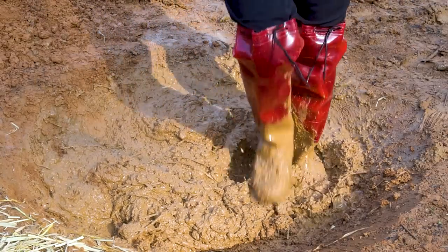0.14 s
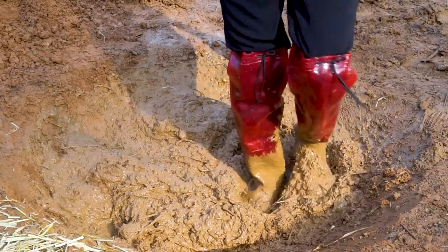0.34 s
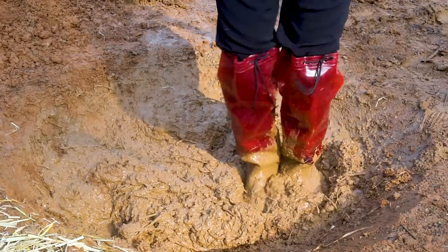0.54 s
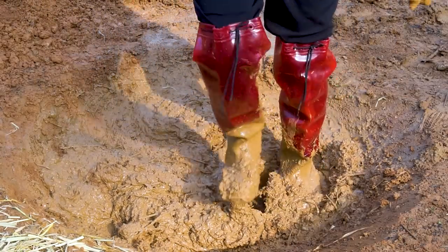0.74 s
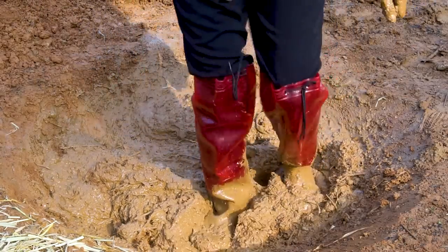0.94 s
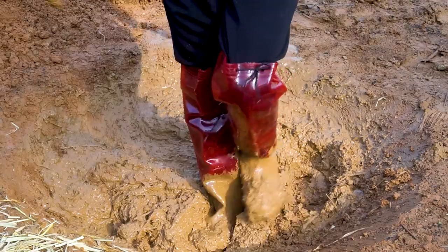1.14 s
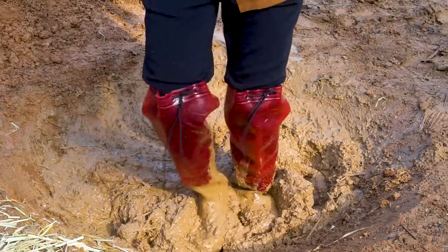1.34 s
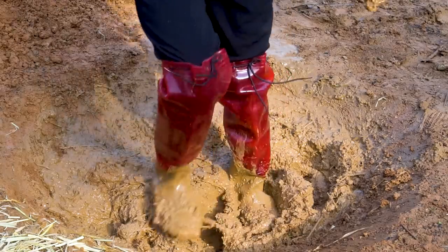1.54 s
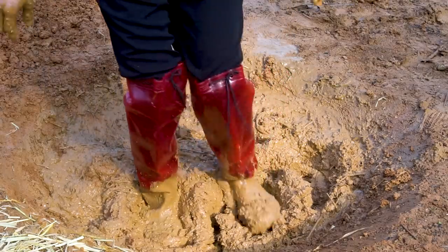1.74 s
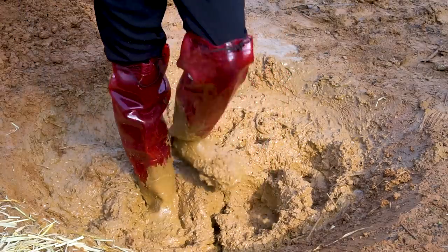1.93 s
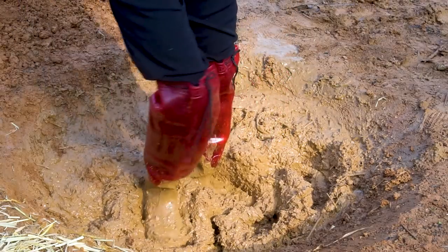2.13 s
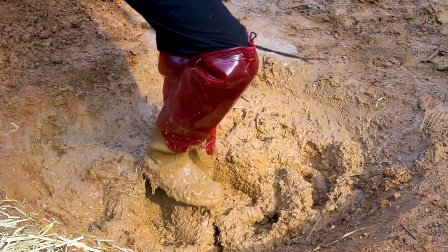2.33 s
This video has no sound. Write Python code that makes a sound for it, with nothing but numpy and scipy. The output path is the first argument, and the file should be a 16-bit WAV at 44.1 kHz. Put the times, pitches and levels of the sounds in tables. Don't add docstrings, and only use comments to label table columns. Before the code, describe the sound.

Someone kneads sticky clay with boots, each step squirting and crackling wetly, each lift sucking and gulping. Several quick squelches follow one another, heard very close in stereo in open air, with barely audible insects behind.

```python
import sys
import numpy as np
from scipy import signal
from scipy.fft import rfft, irfft, next_fast_len
from scipy.io import wavfile

SR = 44100
rng = np.random.default_rng(int(sys.argv[2]) if len(sys.argv) > 2 else 0)


def file_out(sig):
    cols = np.atleast_2d(sig).T
    lim = np.clip(cols, -1, 1)
    pcm = np.round(lim * 32767).astype(np.int16)
    wavfile.write(sys.argv[1], SR, pcm)


def natural_amplitude(level_db):
    exponent = np.asarray(level_db, float) / 20
    return 10 ** exponent


N = 110250

# peak_s, rise_s, fall_s, level_db, tilt_db_per_octave
SPLATS = [(.002, 0.014, 0.039, -44.5, -2), (0.208, 0.013, 0.029, -24.5, -0.5),
          (0.233, 0.01, 0.0074, -21, 5), (0.263, 0.11, 0.05, -48, -3.5), (0.334, 0.01, 0.0033, -31, -3.5),
          (0.368, 0.0017, 0.011, -34.5, -4), (0.505, 0.004, 0.046, -34.5, 0),
          (0.539, 0.011, 0.019, -30.5, 0), (0.628, 0.11, 0.083, -41.5, -1.5),
          (0.893, 0.0061, 0.022, -26, 1.6), (0.927, 0.061, 0.064, -34.5, 0.05),
          (1.023, 0.041, 0.036, -37.5, -0.1), (1.241, 0.025, 0.033, -32, -2),
          (1.266, 0.0086, 0.015, -25, -2), (1.317, 0.04, 0.02, -37, -0.6), (1.335, 0.0039, 0.0096, -31, 3),
          (1.408, 0.065, 0.055, -34, -2.5), (1.645, 0.033, 0.023, -24.5, 3),
          (1.791, 0.012, 0.015, -22.5, -2.5), (2.031, 0.022, 0.02, -25, 3), (2.056, 0.014, 0.27, -49, -2.5),
          (2.171, 0.02, 0.023, -34.5, -0.2), (2.206, 0.024, 0.034, -25, -2),
          (2.481, 0.004, 0.013, -33, -0.5)]
# freq_hz, density_db (per Hz)
MUD_SPECTRUM = [(150, -58), (300, -4.5), (600, -11), (1200, -5.5), (2500, -0.5), (5000, -3), (8500, -8.5),
                (12500, -5)]
# peak_s, rise_s, fall_s, level_db, cavity_hz
SUCKS = [(.01, 0.032, 0.029, -58, 433), (.297, 0.046, 0.043, -33, 1350), (0.381, 0.006, 0.055, -42, 1210),
         (0.3, 0.048, 0.033, -41, 387), (0.54, 0.052, 0.011, -41, 700), (0.618, 0.024, 0.0077, -60, 470),
         (0.696, 0.011, 0.011, -69, 1300), (0.895, 0.011, 0.019, -41.5, 620),
         (0.936, 0.013, 0.0044, -53, 846), (1.025, 0.075, 0.02, -47.5, 1180),
         (2.107, 0.006, 0.0091, -47, 298), (2.015, 0.0018, 0.0044, -37.5, 8900),
         (1.297, 0.0073, 0.017, -47.5, 860), (1.402, 0.042, 0.042, -28, 3730),
         (1.643, 0.031, 0.012, -40, 610), (1.695, 0.004, 0.011, -39.5, 2320),
         (1.755, 0.026, 0.0055, -40.5, 1400), (1.771, 0.014, 0.0076, -37.5, 1210),
         (1.799, 0.0069, 0.012, -35.5, 590), (2.037, 0.028, 0.011, -31.5, 1020),
         (2.108, 0.006, 0.02, -41.5, 1650), (2.143, 0.013, 0.0093, -47, 1600),
         (2.211, 0.015, 0.012, -38.5, 290), (1.264, 0.013, 0.0091, -27.5, 756)]
# start_s, peak_db, pocket_hz
POPS = [(0.185, -38, 1200), (0.2255, -8.5, 2470), (0.322, -17.5, 3570), (0.331, -25.5, 1210),
        (0.4093, -22.5, 2500), (.4413, -23.5, 2650), (0.5825, -26.5, 1800), (0.8657, -31, 5830),
        (0.9938, -24, 1760), (1.0334, -19, 1990), (1.067, -28, 3860), (1.1199, -20.5, 2090),
        (1.132, -27, 4460), (1.262, -10.5, 2010), (1.2652, -8.5, 1930), (1.355, -31, 1830),
        (1.6437, -11, 3140), (1.675, -23, 3400), (1.7082, -24.5, 3900), (1.7736, -19, 1780),
        (1.8183, -19.5, 4470), (2.1037, -14, 2080), (2.1164, -18.5, 2640), (2.172, -14.5, 3400),
        (2.319, -31, 2660), (2.446, -27, 3380), (2.4615, -27.5, 2350),
        (1.491, -31, 9800),
    (1.77, -33, 8900),
    (2.269, -37, 4640),
    (2.282, -28, 5800),
    (2.471, -29.5, 2550),
    (2.479, -27, 4800),
    (2.4985, -26, 2960),
    (2.458, -21, 8000),
        (0.3657, -15.5, 2310), (0.398, -36, 2500), (2.076, -27, 4260), (2.11, -17, 12000),
         (2.253, -44, 2500), (1.23, -17, 8200), (1.257, -9, 7150), (.424, -30, 2450), (.456, -31, 1940),
         (.501, -24, 2480), (0.633, -25, 2890), (0.657, -29, 3040), (0.693, -34, 2340), (.966, -26, 2170),
         (1.007, -27, 3430), (1.019, -26, 3300), (1.104, -30.5, 2700), (1.691, -23.5, 1830),
         (1.782, -17, 2700), (2.159, -26.5, 1980)]
# start_s, peak_db, pitch_hz, t60_s, glide_octaves (per 10 ms)
GULPS = [(.008, -36.5, 347, .02, -0.27), (.104, -55, 1320, .03, 0.), (.281, -20, 820, 0.014, -0.046),
         (.298, -33, 1820, 0.024, 0.046), (.305, -34, 583, 0.017, -0.41), (.374, -34, 900, 0.044, -0.028),
         (.386, -41, 540, .04, .1), (.402, -43.5, 1260, 0.018, 0.26), (.411, -42.5, 426, 0.03, 0.08),
         (.452, -50, 400, 0.16, 0.021), (.502, -36, 750, 0.05, 0.21), (.515, -44, 450, 0.013, 0.17),
         (.612, -36.5, 400, 0.032, -0.018), (.668, -52, 377, .03, 0.054),
         (.685, -40.5, 1130, 0.012, 0.0075), (.936, -35.5, 725, 0.032, -0.0035),
         (.977, -34, 390, 0.03, -0.1), (.985, -22, 400, 0.011, -0.0089), (1.007, -39, 624, 0.017, 0.29),
         (1.063, -47.5, 705, 0.036, .1), (1.096, -49, 450, 0.024, -0.23), (1.707, -50.5, 660, 0.055, 0.013),
         (1.74, -27, 579, 0.043, 0.081), (1.754, -31, 510, 0.035, 0.051), (1.769, -29, 570, 0.019, 0.37),
         (1.791, -23.5, 784, 0.027, 0.078), (1.797, -17.5, 642, 0.015, 0.095),
         (1.815, -35, 716, 0.023, 0.027), (2.048, -33.5, 740, 0.015, 0.044),
         (2.103, -37, 450, 0.019, -0.33), (2.139, -32.5, 803, 0.042, 0.2), (2.151, -41, 520, 0.023, -0.028),
         (2.192, -28, 774, 0.034, 0.079), (2.202, -28, 726, 0.078, 0.073), (2.217, -23.5, 712, 0.024, 0.04),
         (2.32, -46, 650, 0.017, .1)]
# time_s, left_minus_right_db (treble only)
BOOT_POSITION = [(0, 0), (.7, 2), (.9, 4), (1.2, 2), (2.5, 3.5)]
# freq_hz, left_lead_rad
PORT_LEAD = [(100, -0.51), (300, -0.41), (950, -0.76), (2200, -0.7), (3800, 0.43), (6000, -0.72),
             (16000, 0.18)]
# centre_hz, width_hz, level_db
INSECTS = [
    (5080, 450, -61.5),
    (11300, 1300, -70),
]
# freq_hz, level_db
AIR_SPECTRUM = [(30, -26), (120, -27), (500, -3), (1500, -7), (4000, -7), (7000, -8), (11000, -10.5),
                (16000, -13)]
# freq_hz, correlation (1 same, -1 opposite)
AIR_LIKENESS = [(60, 1), (380, 0.28), (2380, -0.25), (15000, 0.21)]
# time_s, level_db
BREEZE = [(0, -3), (.8, -3.5), (1.6, -2.5), (2.5, 1)]

BANDS = np.geomspace(200, 16000, 28)
POCKETS_PER_S, POCKET_SPREAD_DB, POCKET_CYCLES = 16000, 3.2, 18.0
GULPS_PER_S, GULP_CYCLES, CAVITY_OCTAVES, SPILL_DB = 9000, 12.0, 0.91, -17
TEARS_PER_S, SPLAT_TEARS, SUCK_TEARS = 2500, .2, .15
LUMP_DB, LUMPS_PER_S, COLOUR_DB = 1.5, 200, 1.5
PATCH_DB, PATCHES_PER_S, PATCH_TOP = 3.3, 90, 1.1
OOZE_DB, OOZE_S = -15, .04
ROUNDING = 1.45
DULL_EDGE = 1.45
POP_CYCLES, POP_DB, POP_TONE_DB, POP_RISE_S, POP_TOP_HZ = 14.0, -5.0, 0.0, 0.0008, 10000
POP_SPIT_S, POP_SPIT_DB = .004, -5.0
GULP_RISE_CYCLES, GULP_DB = 1.13, 3.0
SPECKS_PER_S, SPECK_DB, SPECK_CYCLES = 130, -66, 30.0
AIR_DB = -54
SHADOW_HZ = 2500
SPREAD_DB, SPREADS_PER_S = 3.5, 40
BOUNCE_S, BOUNCE_DB, BOUNCE_HZ = .00163, -6, 3500
SCATTER_DB, SCATTER_S = -7.5, .025
LOW_CUT_HZ, TOP_HZ = 170, 16000
TIME_S = np.arange(N) / SR


def rms_one(x):
    return x / np.sqrt(np.mean(x ** 2) + 1e-20)


def at_hz(points, hz):
    table_hz, values = np.transpose(points)
    return np.interp(np.log(hz), np.log(table_hz), values)


def at_time(points):
    return np.interp(TIME_S, *np.transpose(points))


def drift(rate_hz):
    r = np.exp(-2 * np.pi * rate_hz / SR)
    settled = signal.lfilter([1], [1, -2 * r, r * r], rng.standard_normal(N + 4000))[4000:]
    return rms_one(settled)


def ring(clicks, hz, t60_s):
    r = natural_amplitude(-60 / (t60_s * SR))
    turn = 2 * np.pi * hz / SR
    return signal.lfilter([1, 0, -1], [1, -2 * r * np.cos(turn), r * r], clicks + 1e-18)


def grains(rate):
    sizes = natural_amplitude(POCKET_SPREAD_DB * np.minimum(rng.exponential(1, N), 3))
    signs = rng.choice([-1, 1], N)
    return rms_one(sizes * signs * (rng.random(N) < rate / SR))


def swells(rows, power, ooze_power):
    peak_s, rise_s, fall_s, level_db = np.transpose(rows)[:4, :, None]
    t = TIME_S - peak_s
    progress = np.clip(np.where(t < 0, -t / rise_s, t / fall_s), 0, 1)
    swell = np.cos(np.pi / 2 * progress) ** power
    ooze = natural_amplitude(OOZE_DB * ooze_power) * (t > 0) * np.exp(-np.abs(t) / OOZE_S)
    return natural_amplitude(level_db) * np.maximum(swell, ooze)


def pockets(rows, share_db, rate, cycles, tear_share):
    share = natural_amplitude(share_db + COLOUR_DB * rng.standard_normal(share_db.shape))
    share = share / np.sqrt(np.sum(share ** 2, axis=0))
    bright = np.clip(np.log2(BANDS / 2500) / 2, 0, 1)[:, None]
    sharp_power = 1.35 * DULL_EDGE
    dull_flow = (share * (1 - bright)) @ swells(rows, ROUNDING, 1)
    bright_flow = (share * bright) @ swells(rows, sharp_power, sharp_power / ROUNDING)
    lumps = natural_amplitude(LUMP_DB * np.minimum(drift(LUMPS_PER_S), PATCH_TOP))
    flow = (dull_flow + bright_flow) * lumps

    tears, bursts = grains(TEARS_PER_S), grains(rate)
    dealt = rng.integers(0, len(BANDS), N)
    patches = [natural_amplitude(PATCH_DB * np.minimum(drift(PATCHES_PER_S), PATCH_TOP)) for _ in BANDS[::2]]
    out = np.zeros(N)
    for k, hz in enumerate(BANDS):
        own = bursts * (dealt == k) * np.sqrt(len(BANDS)) * patches[k // 2]
        clicks = tear_share * tears + own
        size = np.sqrt(np.mean(ring(clicks, hz, cycles / hz) ** 2))
        out += (-1) ** k * ring(clicks * flow[k], hz, cycles / hz) / size
    return out


def splats():
    band_db = at_hz(MUD_SPECTRUM, BANDS) + 10 * np.log10(BANDS)
    tilt_db = np.outer(np.log2(BANDS / 3000), np.transpose(SPLATS)[4])
    return pockets(SPLATS, band_db[:, None] + tilt_db, POCKETS_PER_S, POCKET_CYCLES, SPLAT_TEARS)


def sucks():
    octaves = np.log2(BANDS[:, None] / np.transpose(SUCKS)[4]) / CAVITY_OCTAVES
    resonance_db = -6 * np.log2(1 + octaves ** 4)
    spill_db = np.where(octaves > 0, SPILL_DB, -60)
    return pockets(SUCKS, np.maximum(resonance_db, spill_db), GULPS_PER_S, GULP_CYCLES, SUCK_TEARS)


def pops():
    out, t = np.zeros(N + 3000), np.arange(3000) / SR
    dull = np.exp(-2 * np.pi * POP_TOP_HZ / SR)
    rise = np.minimum(t / POP_RISE_S, 1)
    for start_s, peak_db, hz in POPS:
        high_pass = signal.butter(2, hz * .7, "high", fs=SR)
        white = signal.lfilter(*high_pass, rng.standard_normal(len(t)))
        hiss = signal.lfilter([1 - dull], [1, -dull], white)
        hiss_db = POP_SPIT_DB + np.minimum(peak_db + 22, 0) / 2
        spit = rms_one(ring(white, hz, 2.5 / hz)) + natural_amplitude(hiss_db) * hiss
        spit = spit * natural_amplitude(-26 * t / POP_SPIT_S) * rise
        tone = np.sin(2 * np.pi * hz * t) * natural_amplitude(POP_TONE_DB - 30 * t * hz / POP_CYCLES) * rise
        i = int(start_s * SR)
        out[i:i + len(t)] += natural_amplitude(peak_db + POP_DB) * (spit / np.abs(spit).max() + tone)
    return out[:N]


def gulps():
    out, t = np.zeros(N + 3000), np.arange(3000) / SR
    for start_s, peak_db, hz, t60_s, glide in GULPS:
        turns = np.cumsum(hz * 2 ** np.clip(glide * t / .01, -1, 1)) / SR
        envelope = natural_amplitude(peak_db + GULP_DB - 60 * t / t60_s) * np.minimum(turns / GULP_RISE_CYCLES, 1)
        i = int(start_s * SR)
        out[i:i + len(t)] += np.sin(2 * np.pi * turns) * envelope
    return out[:N]


def specks():
    clicks, high = grains(SPECKS_PER_S), BANDS[BANDS > SHADOW_HZ]
    dealt = rng.integers(0, len(high), N)
    rings = sum(ring(clicks * (dealt == k), hz, SPECK_CYCLES / hz) for k, hz in enumerate(high))
    return natural_amplitude(SPECK_DB + at_time(BREEZE)) * rms_one(rings)


def at_ports(mud):
    low_pass = signal.butter(1, BOUNCE_HZ, fs=SR)
    late = np.interp(np.arange(N) - BOUNCE_S * SR, np.arange(N), mud, left=0)
    mud = (mud + natural_amplitude(BOUNCE_DB) * signal.lfilter(*low_pass, late)) * 0.9

    size = next_fast_len(N + 2000)
    lead_rad = at_hz(PORT_LEAD, np.fft.rfftfreq(size, 1 / SR) + 1)
    turned = rfft(mud, size) * np.exp(.5j * lead_rad * [[1], [-1]])
    ports = irfft(turned, size)[:, :N]

    bass = signal.lfilter(*signal.butter(1, SHADOW_HZ, fs=SR), ports)
    balance_db = at_time(BOOT_POSITION) + SPREAD_DB * drift(SPREADS_PER_S)
    ports = bass + (ports - bass) * natural_amplitude(balance_db * [[.5], [-.5]])

    echoes = np.diff(rng.standard_normal((2, 900))) * natural_amplitude(-60 * np.arange(899) / SR / SCATTER_S)
    echoes = echoes / np.sqrt(np.sum(echoes ** 2, axis=1))[:, None]
    return ports + natural_amplitude(SCATTER_DB) * signal.fftconvolve(mud[None], echoes)[:, :N]


def insects():
    out = np.zeros((2, N))
    for hz, width_hz, level_db in INSECTS:
        mid, side = rng.standard_normal((2, N)) * natural_amplitude(2.5 * drift(130))
        edges_hz = [hz - width_hz / 2, hz + width_hz / 2]
        band = signal.butter(2, edges_hz, "band", fs=SR, output="sos")
        out += natural_amplitude(level_db) * rms_one(signal.sosfilt(band, mid + 0.6 * side * [[1], [-1]]))
    return out


def air():
    out, white = np.zeros((2, N)), rng.standard_normal((2, 2, N))
    edges_hz = 30 * 2 ** np.arange(0, 9.6, .5)
    for k, (low, high) in enumerate(zip(edges_hz, edges_hz[1:])):
        band = signal.butter(2, [low, high], "band", fs=SR, output="sos")
        mid, side = signal.sosfilt(band, white[k % 2])
        hz = np.sqrt(low * high)
        alike = np.clip(at_hz(AIR_LIKENESS, hz), -1, 1)
        level_db = at_hz(AIR_SPECTRUM, hz) + 2 * drift(16.6) + (hz > 6000) * at_time(BREEZE)
        both = np.sqrt(1 + alike) * mid + np.sqrt(1 - alike) * side * [[1], [-1]]
        out += natural_amplitude(level_db) * both
    return natural_amplitude(AIR_DB) * rms_one(out)


def scene():
    low_cut = signal.butter(4, LOW_CUT_HZ, "high", fs=SR, output="sos")
    mud = signal.sosfilt(low_cut, splats() + sucks() + pops() + gulps() + specks())
    return at_ports(mud) + insects() + air()


def roll_off(x):
    return signal.sosfilt(signal.butter(12, 17010, fs=SR, output="sos"), x)


def record(dry):
    top_cut = signal.cheby2(10, 50, TOP_HZ * 1.015, fs=SR, output="sos")
    mix = signal.sosfilt(top_cut, dry)
    return roll_off(mix)


dry = scene()
out = record(dry)
file_out(out)
```